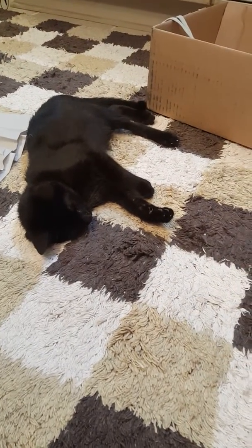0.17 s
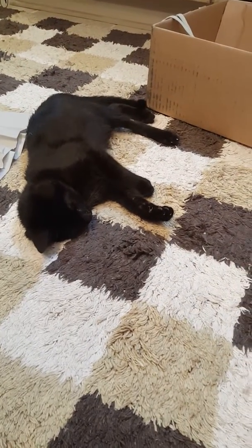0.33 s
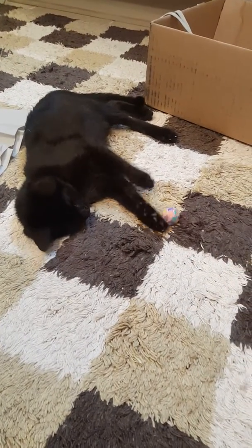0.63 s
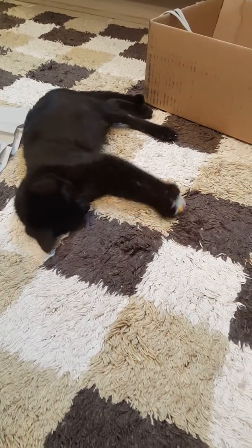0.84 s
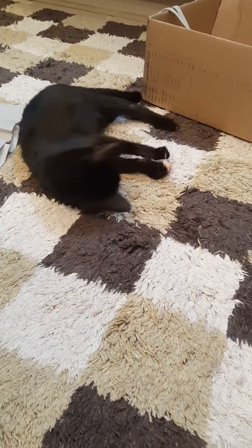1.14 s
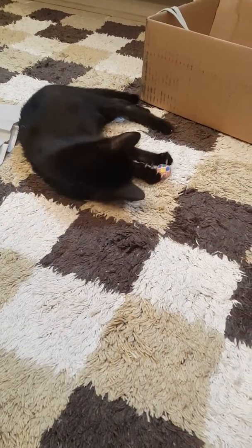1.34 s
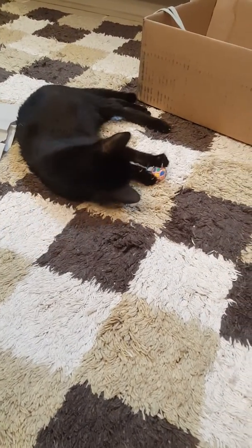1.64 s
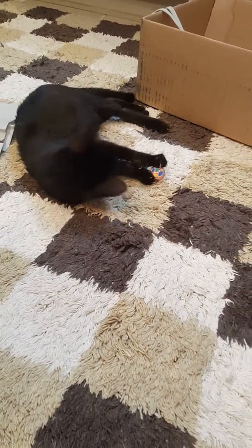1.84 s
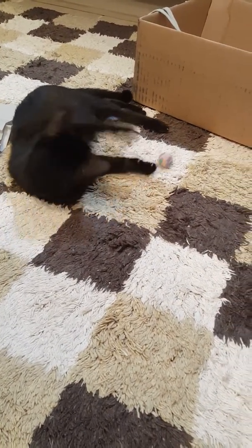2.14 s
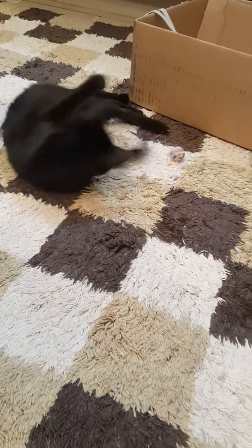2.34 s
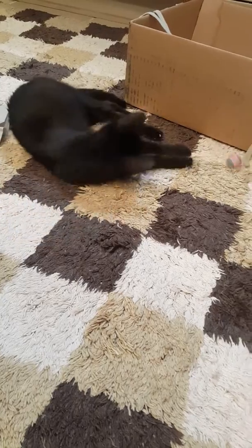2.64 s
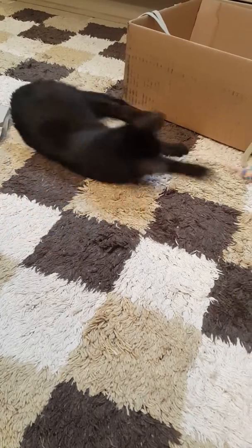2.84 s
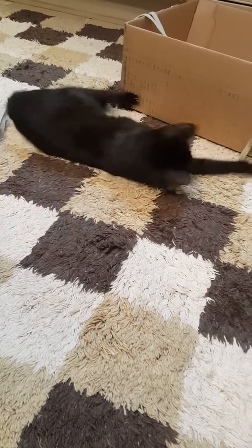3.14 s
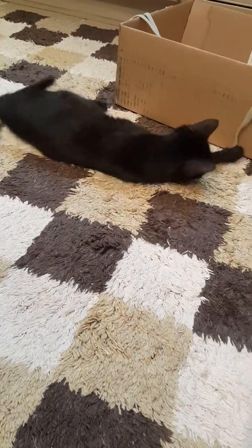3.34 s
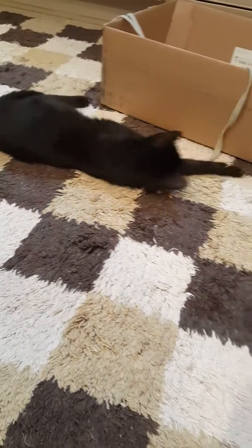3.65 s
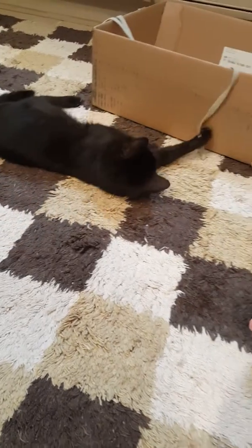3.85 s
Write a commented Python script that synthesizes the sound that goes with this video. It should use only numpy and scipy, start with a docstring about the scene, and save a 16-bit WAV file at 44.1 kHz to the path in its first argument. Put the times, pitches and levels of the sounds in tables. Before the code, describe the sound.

A cat purrs in a low, rapid flutter in a quiet room; later claws tick softly on the rug, and a small hard ball knocks and rattles against a hollow cardboard box. Close stereo microphone with faint hiss.

```python
"""Throughout, faint room tone and hiss lie under a cat's purr on a rug: about 25 larynx twitches a second,
each a pair of pulses ringing chest and throat; the chest part all but vanishes from 2.4 to 3.4 s.
From 2.3 s claws click in the rug; from 2.6 s paws thump and a small hard ball raps a cardboard box, ringing
its modes, while fur and paws drag. From 3.0 s the ball also rattles in bursts of dense ticks.
Two microphone ports hear it."""
import sys
import numpy as np
from scipy import signal
from scipy.fft import rfft, irfft
from scipy.io import wavfile

SR = 44100
rng = np.random.default_rng(int(sys.argv[2]) if len(sys.argv) > 2 else 0)


def to_wav(sig):
    """Store sig (one row per channel, or 1-D mono) as 16-bit WAV at the path in sys.argv[1].

    Samples outside -1..1 are clipped; the rate is SR.
    """
    pcm = np.clip(np.atleast_2d(sig), -1, 1) * 32767
    pcm = np.round(pcm).astype(np.int16)
    wavfile.write(sys.argv[1], SR, pcm.T)  # frames by channels


def gain_from_db(level_db):
    """Turn a decibel level (scalar or array-like) into a linear amplitude factor."""
    decades = np.asarray(level_db, float) / 20
    return 10 ** decades


N = 176400
MIC_PEAK_HZ, MIC_PEAK_WIDTH_HZ = 8330, 900  # microphone resonance that colours the ticks of raps and rattle


def evened(x):
    """Scales to rms 1."""
    return x / np.sqrt(np.mean(x ** 2) + 1e-20)


def read(points, hz):
    """Interpolates a (Hz, value) curve over log frequency."""
    f, value = np.transpose(points)
    return np.interp(np.log(hz + 1), np.log(f + 1), value)


def add(mix, s, sound):
    """Adds sound to mix in place from s seconds, cut at the end of mix."""
    part = mix[..., max(round(s * SR), 0):][..., :sound.shape[-1]]
    part += sound[..., :part.shape[-1]]


def coloured(points, size):
    """Noise of rms 1 with the given (Hz, dB) spectrum."""
    gain = gain_from_db(read(points, np.fft.rfftfreq(size, 1 / SR)))
    return evened(irfft(rfft(rng.standard_normal(size)) * gain, size))


def ring(modes, size=16000):
    """One dying sine per (Hz, dB, t60 s) mode, as rows; neighbours swing in opposite directions."""
    hz, db, t60_s = np.transpose(modes)[:, :, None]
    t = np.arange(size) / SR
    sign = (-1.) ** np.arange(len(hz))[:, None]
    return sign * gain_from_db(db - 60 * t / t60_s) * np.sin(2 * np.pi * hz * t)


def peak(x, hz, width_hz):
    """One spectral peak, scaled to rms 1."""
    return evened(signal.lfilter(*signal.iirpeak(hz, hz / width_hz, SR), x))


def softened(x, contact_s):
    """A blow that lasts a moment loses its sharpest edge."""
    push = np.hanning(round(contact_s * SR) + 3)
    return np.convolve(x, push / push.sum())[:len(x)]


def placed(x, pan_db, room_db):
    """Direct sound panned (left over right), plus sparse random taps whose bands die at their own speed."""
    # Room decay. Each row: frequency in Hz, t60 in s.
    decay = [(100, 0.38), (300, 0.32), (1000, 0.33), (3000, 0.31), (8000, 0.28), (15000, 0.24)]
    # Left-right likeness of the reverberation. Each row: frequency in Hz, likeness 0 to 1.
    tail_same = [(30, .99), (150, 0.96), (400, 1), (900, 0.18), (2000, 0.033), (16000, .05)]
    taps = np.zeros((2, SR // 2))
    at = np.arange(200, SR // 2 - 20, 20)
    shape = (2, len(at))
    np.put_along_axis(taps, at + rng.integers(0, 20, shape), rng.choice([-1., 1.], shape), 1)
    hz, t, z = signal.stft(taps, SR, nperseg=512)
    same = np.clip(read(tail_same, hz), 0, 1)[:, None]
    z[1] = same * z[0] + np.sqrt(1 - same ** 2) * z[1]
    tail = signal.istft(z * gain_from_db(-60 * t / read(decay, hz)[:, None]), SR, nperseg=512)[1]
    wet = signal.fftconvolve(x[None], tail / np.linalg.norm(tail[0]), axes=1)[:, :N]
    direct = x * gain_from_db(np.array([[pan_db / 2], [-pan_db / 2]]))
    return direct + gain_from_db(room_db) * wet


def room_tone():
    """Room tone and hiss: steady noise, alike in both ports only in the bass."""
    # Spectrum shape. Each row: frequency in Hz, relative density in dB per Hz.
    tone = [(12, -58), (20, -9), (65, -2.5), (113, 8.5), (422, -3.5), (780, -5), (976, -8), (1530, -7.5),
            (2460, -11), (3160, -13), (3630, -15.5), (9950, -24), (16000, -18.5)]
    # Each row: frequency in Hz, left-right likeness 0 to 1.
    tone_same = [(30, 1), (150, 0.75), (400, 0.41), (900, 0.11), (2000, 0.017), (16000, 0.017)]
    hz = np.fft.rfftfreq(N, 1 / SR)
    a, b = rfft(rng.standard_normal((2, N)))
    same = np.clip(read(tone_same, hz), 0, 1)
    z = np.array([a, same * a + np.sqrt(1 - same ** 2) * b]) * gain_from_db(read(tone, hz))
    return gain_from_db(-68.5) * evened(irfft(z, N))


def rug():
    """Claw clicks are dying peaked noise, drags are swelling coloured noise, brief tones are soft sines."""
    # Claws in the rug. Each row: start in s, level in dB, centre in Hz.
    clicks = [(2.283, -68.5, 5600), (2.325, -69, 5900), (2.366, -71, 6000), (2.387, -71, 6940),
              (2.696, -68.5, 8100), (3.455, -66.5, 7840), (3.508, -69.5, 6160), (3.564, -67.5, 7760)]
    # Fur and paws over the rug. Each row: start in s, length in s, level in dB.
    drags = [(2.7, 0.49, -72.5), (3.7, 0.11, -72)]
    # Drag spectrum. Each row: frequency in Hz, relative level in dB.
    drag_spectrum = [(200, -10), (1000, -15), (2000, -1), (3200, -3), (5000, -15), (9000, -25)]
    # Soft brief tones. Each row: start in s, length in s, pitch in Hz, level in dB.
    tones = [(.56, 0.11, 402.5, -71.5), (2.46, 0.14, 158.5, -62), (3.47, 0.047, 374, -65.5)]
    click_t60_s, click_width_hz = 0.024, 1500
    out, t = np.zeros(N), np.arange(1024) / SR
    for s, db, hz in clicks:
        click = peak(rng.standard_normal(1024), hz, click_width_hz)
        add(out, s, gain_from_db(db - 60 * t / click_t60_s) * click)
    for s, length_s, db in drags:
        size = round(length_s * SR)
        add(out, s, gain_from_db(db) * np.hanning(size) * coloured(drag_spectrum, size=32768)[:size])
    for s, length_s, hz, db in tones:
        t = np.arange(0, length_s, 1 / SR)
        add(out, s, gain_from_db(db) * np.sin(np.pi * t / length_s) * np.sin(2 * np.pi * hz * t))
    return placed(out, pan_db=0.53, room_db=-4)


def rattle():
    """Dense tiny ball ticks, peaked by the microphone over a wide skirt, that die away after each rap."""
    # Each row: start in s, t60 in s, level in dB.
    bursts = [(3.044, 0.22, -66), (3.204, 0.18, -69), (3.24, 0.093, -46.5), (3.773, 0.12, -50.5),
              (3.839, 0.069, -63.5)]
    # Wide part of the spectrum: low edge in Hz, high edge in Hz, level in dB.
    skirt = (4200, 14000, 0)
    ticks_per_s, rise_s = 1200, 0.0014
    struck = rng.random(N) < ticks_per_s / SR
    grains = gain_from_db(2.4 * rng.exponential(1, N)) * struck * rng.choice([-1., 1.], N)
    band = signal.butter(1, skirt[:2], "band", fs=SR, output="sos")
    wide = gain_from_db(skirt[2]) * evened(signal.sosfilt(band, grains))
    sound = peak(grains, MIC_PEAK_HZ, MIC_PEAK_WIDTH_HZ) + wide
    level, t = np.zeros(N), np.arange(SR // 2) / SR
    for s, t60_s, db in bursts:
        add(level, s, gain_from_db(db - 60 * t / t60_s) * np.minimum(t / rise_s, 1))
    return placed(level * sound, pan_db=-9.5, room_db=-3)


def knocks():
    """Each blow gives a low thud, rings the upper modes near its own centre, cracks the card and ticks."""
    # Box modes. Each row: frequency in Hz, relative level in dB, t60 in s.
    modes = np.array([(112.4, -0.5, .16), (188, 3, 0.12), (252.2, 2, 0.13), (294, 2.5, 0.06),
                      (398.4, 1, 0.069), (477.6, 2.5, .17), (496.7, -2.5, 0.17), (545.4, -6.5, 0.11),
                      (568, -1.5, 0.12), (643.7, 0, 0.14), (662.7, -9, 0.17), (756, -5, 0.1),
                      (808, -4, 0.14), (873, -7, 0.13), (1141, -7.5, 0.12), (1454, 10, 0.061),
                      (1533, 6, .1), (2180, 7, 0.12), (2530, 2, .13)])
    # Each row: start in s, low thud in dB and ring in dB (modes are halved below), strongest ring in Hz,
    # contact in s, crack in dB, ball tick in dB.
    blows = [(2.5813, -22.5, -29, 690, 0.00036, -43, -47), (3.0314, -43, -39, 900, 0.00036, -45, -57.5),
             (3.171, -37, -42.5, 706, 0.0012, -56.5, -68), (3.198, -40, -53, 500, 0.0018, -52, -78),
             (3.2316, -36.5, -22, 636, 0.00019, -29, -39), (3.717, -46.5, -85, 490, 0.0052, -85, -76),
             (3.74, -54, -85, 500, 0.0051, -92, -87.5), (3.7705, -48.5, -29, 813, 0.00019, -31, -44),
             (3.796, -51.5, -37.5, 496, 0.00075, -46, -39), (3.853, -75, -77, 497, 0.00051, -58, -46)]
    # Crack spectrum. Each row: frequency in Hz, relative level in dB.
    crack_spectrum = [(300, -7), (1000, 4.5), (1500, -0.5), (2500, -2.5), (4000, -12), (6000, -22),
                      (12000, -20), (16000, -32)]
    thud_top_hz, box_low_hz = 430, 60
    ring_octaves, far_share = .42, .08  # spread of the excited modes, least share of any
    body_db, body_t60_s = -14.5, 0.064  # dense shudder of the card between the modes, dB over ring
    crack_t60_s, tick_t60_s = 0.042, 0.017
    box, cracks, ticks = np.zeros((3, N))
    t = np.arange(8192) / SR
    low = modes[:, 0] < thud_top_hz
    thud, upper = ring(modes[low]).sum(0), modes[~low]
    rings = -ring(upper) * (-1.) ** np.arange(len(upper))[:, None]  # all swing the same way at first
    grid_hz = np.geomspace(40, 8000, 40)
    for s, thud_db, ring_db, centre_hz, contact_s, crack_db, tick_db in blows:
        distance = np.log2(upper[:, 0] / centre_hz) / ring_octaves
        share = np.maximum(np.exp(-.5 * distance ** 2), far_share)
        modal = gain_from_db(thud_db) * thud / 2 + gain_from_db(ring_db) * share @ rings / 2
        add(box, s, softened(modal, contact_s))
        hump_db = np.maximum(-4.34 * (np.log2(grid_hz / centre_hz) / ring_octaves) ** 2, -80)
        body = coloured(np.c_[grid_hz, hump_db], size=8192)
        add(box, s, softened(gain_from_db(ring_db + body_db - 60 * t / body_t60_s) * body, contact_s))
        crack = coloured(crack_spectrum, size=8192)
        add(cracks, s, gain_from_db(crack_db - 60 * t / crack_t60_s) * crack)
        tick = peak(rng.standard_normal(8192), MIC_PEAK_HZ, MIC_PEAK_WIDTH_HZ)
        add(ticks, s, gain_from_db(tick_db - 60 * t / tick_t60_s) * tick)
    # the box is too small for deep bass
    box = signal.sosfilt(signal.butter(2, box_low_hz, "high", fs=SR, output="sos"), box)
    return (placed(box, pan_db=0.6, room_db=-6)
            + placed(cracks, pan_db=5.5, room_db=-1.54)
            + placed(ticks, pan_db=-8.5, room_db=-15))


def purr():
    """Each twitch opens, then shuts the vocal folds; both ring chest and throat, a hard closing snaps more."""
    # Pace. Each row: time in s, twitches so far.
    pace = [(-.025, 0), (.157, 5), (.2335, 7), (.586, 16), (.66, 18), (.7044, 19), (.985, 26), (1.098, 29),
            (1.177, 31), (1.26, 33), (1.34, 35), (1.377, 36), (1.461, 38), (1.5445, 40), (1.678, 43),
            (1.846, 47), (1.9236, 49), (2.123, 54), (2.371, 60), (3.513, 89), (3.666, 93), (4.05, 103)]
    # Effort. Each row: time in s, chest in dB, throat on opening in dB, throat on closing in dB.
    effort = [(0, -55.5, -62.5, -60), (.17, -63.5, -65.5, -69), (.24, -60, -65.5, -61), (.5, -55, -60, -59),
              (.64, -58.5, -67, -61), (.72, -55.5, -64, -60), (.83, -55.5, -55, -57.5),
              (.99, -57.5, -78, -62), (1.08, -57, -65, -54), (1.2, -58, -61, -54),
              (1.371, -55.5, -67, -53.5), (1.42, -69, -80, -72), (1.52, -53.5, -58, -60),
              (1.76, -55, -60, -58), (1.81, -59, -70, -58), (1.88, -67, -75, -72), (1.98, -57.5, -65, -58),
              (2.382, -60, -65, -57), (2.42, -89, -77, -68.5), (3.4, -84, -66, -78),
              (3.52, -59.5, -64, -57), (3.68, -58.5, -68, -61), (3.73, -72, -70, -85)]
    # Resonances, then the edge of a hard closing. Each row: frequency in Hz, relative level in dB, t60 in s.
    chest, throat, snap = [(148.7, 0, 0.026), (241.4, 1, 0.075), (422, -17, 0.029)], [(706, 5, 0.02), (900, -8, 0.0091)], [(1460, -18, 0.0072), (2100, -1, 0.007)]
    lead_in_s, pair_gap_s, jitter_s, pulse_s = .001, .0138, .0008, .0004
    chest_closing_db, hard_db, uneven_db = -0.5, 8, 1.0
    s, turns = np.transpose(pace)
    opens = np.interp(np.arange(1, 102), turns, s) - lead_in_s
    chance = rng.standard_normal((len(opens), 4))
    at, chest_db, open_db, close_db = np.transpose(effort)
    # the snap is full once closing outweighs opening by hard_db
    snap_db = close_db + np.clip(close_db - open_db - hard_db, -20, 0)
    opening = (chest_db, open_db, open_db - 18)
    closing = (chest_db + chest_closing_db, close_db, snap_db)
    trains = np.zeros((3, N + SR))  # impulses for chest, throat, snap
    for k, curves in enumerate((opening, closing)):
        when = opens + k * pair_gap_s + jitter_s * chance[:, k]
        levels = np.array([np.interp(when, at, db) for db in curves])
        trains[:, (when * SR).astype(int)] = gain_from_db(levels + uneven_db * chance[:, 2 + k])
    out = sum(signal.oaconvolve(train, ring(modes, size=4000).sum(0))[:N]
              for train, modes in zip(trains, (chest, throat, snap)))
    return placed(softened(out, pulse_s), pan_db=0, room_db=-18)


def scene():
    """Sums all layers, background first."""
    return room_tone() + rug() + rattle() + knocks() + purr()


def roll_off(x):
    """The treble ends steeply here."""
    return signal.sosfilt(signal.butter(12, 16450, fs=SR, output="sos"), x)


def record(dry):
    """The left port hears first; the microphone cuts deep bass; a small steady offset is added."""
    lead_samples, cut_hz, offset = 6, 25, -.0004
    late = np.array([dry[0], np.roll(dry[1], lead_samples)])
    cut = signal.sosfilt(signal.butter(2, cut_hz, "high", fs=SR, output="sos"), late)
    return roll_off(cut + offset)


dry = scene()
out = record(dry)
to_wav(out)
```